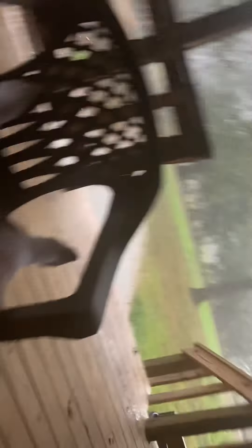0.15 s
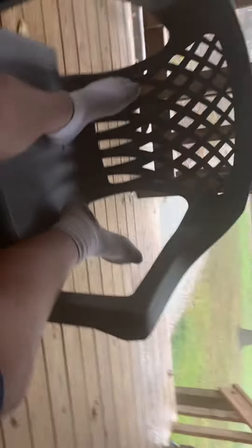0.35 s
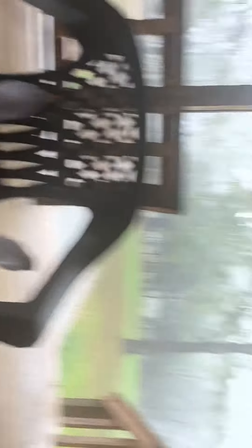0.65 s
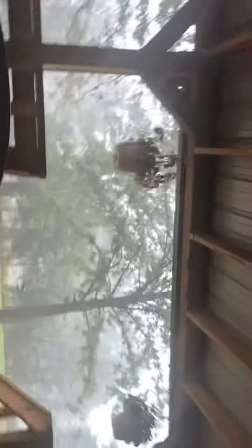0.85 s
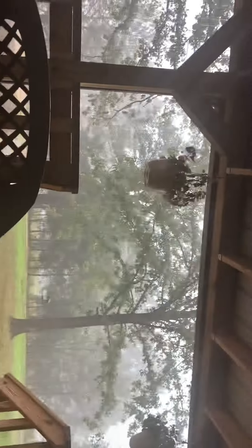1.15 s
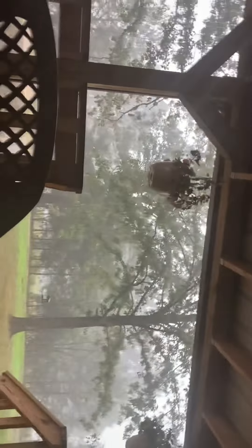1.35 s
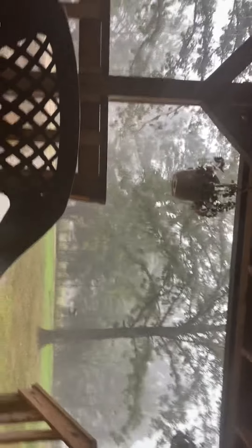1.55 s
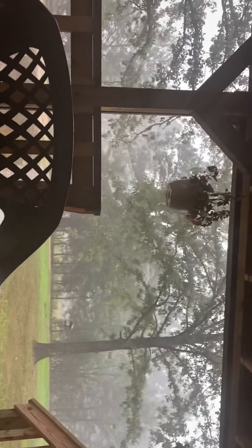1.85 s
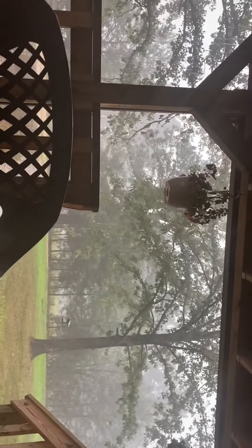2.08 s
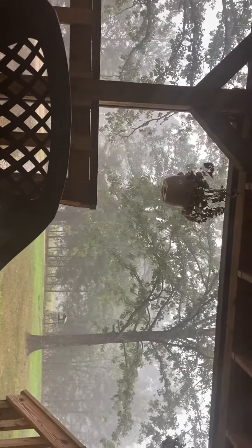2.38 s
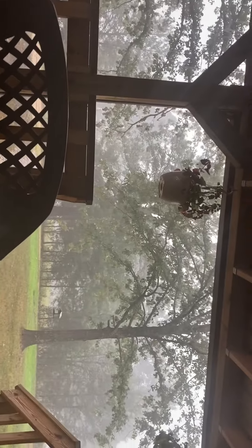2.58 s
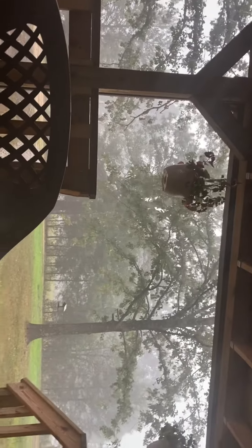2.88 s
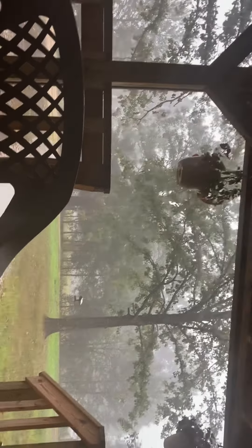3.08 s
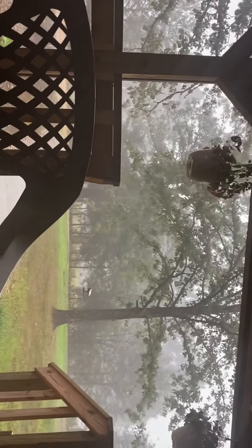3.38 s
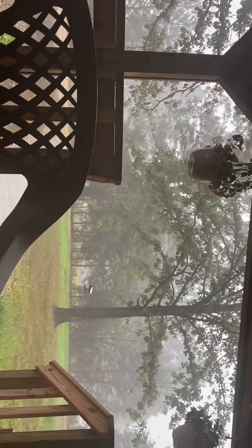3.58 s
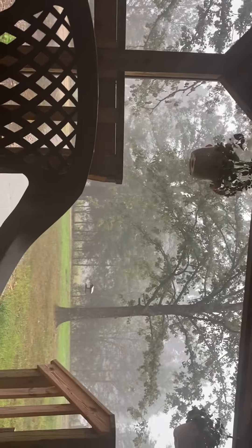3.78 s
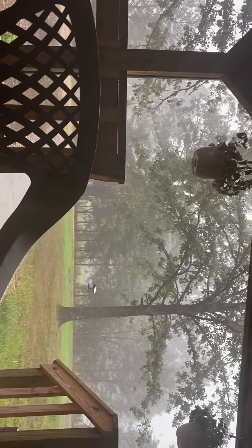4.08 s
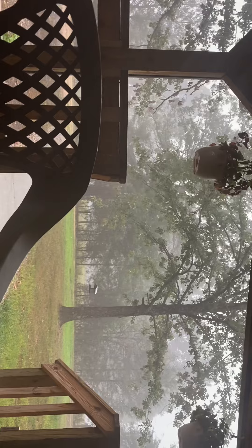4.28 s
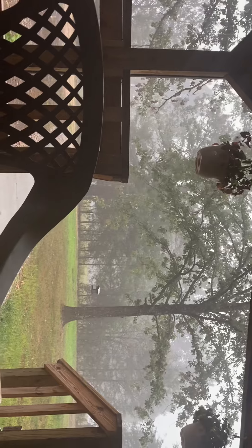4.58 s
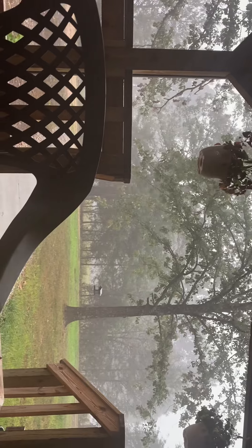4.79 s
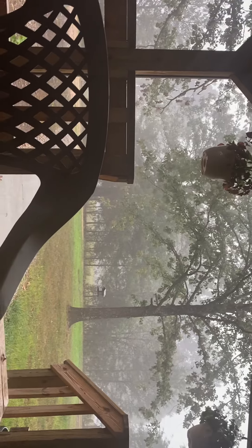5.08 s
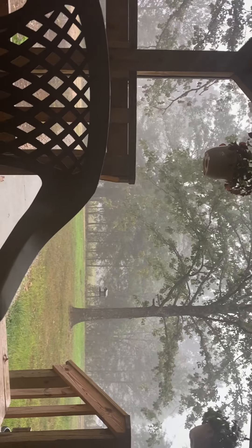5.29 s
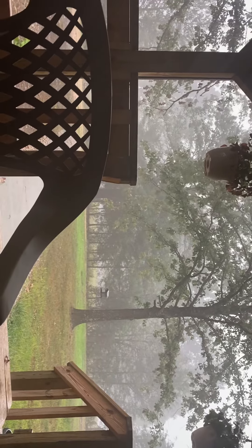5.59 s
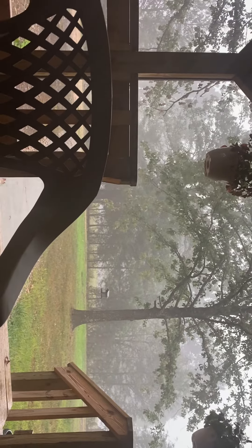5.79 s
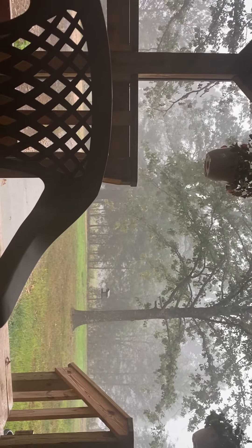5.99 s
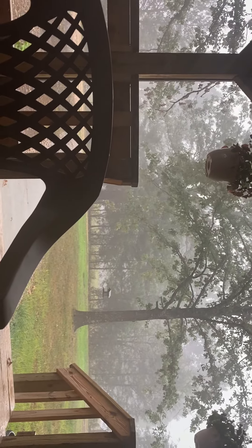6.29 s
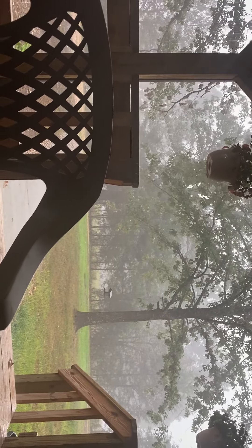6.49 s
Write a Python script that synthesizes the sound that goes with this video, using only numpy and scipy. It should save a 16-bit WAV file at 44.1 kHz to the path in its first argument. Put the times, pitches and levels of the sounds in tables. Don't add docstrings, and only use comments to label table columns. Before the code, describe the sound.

Heavy rain drums on a corrugated metal porch roof, a dense steady roar with bright hissing spray and occasional close drip splats.

```python
import sys
import numpy as np
from scipy import signal
from scipy.fft import rfft, irfft, next_fast_len
from scipy.io import wavfile
from scipy.ndimage import uniform_filter1d

SR = 44100
rng = np.random.default_rng(int(sys.argv[2]) if len(sys.argv) > 2 else 0)


def dump(signal):
    limited = np.clip(np.atleast_2d(signal).T, -1, 1)
    pcm = np.round(limited * 32767).astype(np.int16)
    wavfile.write(sys.argv[1], SR, pcm)


def voltage_ratio(level):
    return 10 ** (np.asarray(level, float) / 20)


N = 293265
SIZE = next_fast_len(N + SR)
HZ = np.maximum(np.arange(SIZE // 2 + 1) * SR / SIZE, 1)
TO_CENTRE_SIDES = np.array([[1, 1], [1, -1]]) / 2


# mode_hz, width_hz, level_db
SHEET_MODES = [(58.7, 43, -7.5), (83, 45, -4.5), (118, 23, -1.5), (155.9, 12.3, -1), (182.3, 22, -3.5),
               (227, 17.6, 0.5), (254.8, 21, -1), (275.8, 16.5, 0.5), (305, 23, -2.5), (331.4, 28, -3.5),
               (389.8, 36.6, -3), (412.4, 16.4, -1.5), (469.4, 59, -8)]


def drumming():
    response = 0
    for k, (mode_hz, width_hz, level_db) in enumerate(SHEET_MODES):
        damping = 1j * width_hz * HZ
        response = response + (-1) ** k * voltage_ratio(level_db) * damping / (mode_hz ** 2 - HZ ** 2 + damping)
    return layer(response, per_s=3000, spread_db=2.5, gust_db=0.5, gust_hz=2.2,
                 mean_db=-24.5, rain_share=1.04, blown_share=0.5, floor_db=-0.4)


# freq_hz, level_db (per Hz)
PATTER_COLOUR = [(200, -23), (380, -9), (520, -2), (950, -3), (1100, -1.7), (1280, -2), (1500, -5.5),
                 (1800, -14), (2600, -34.5)]


def patter():
    return layer(voltage_ratio(at_hz(PATTER_COLOUR)), per_s=9000, spread_db=2.5, gust_db=0.5, gust_hz=8.5,
                 mean_db=-25, rain_share=0.5, blown_share=0.54, floor_db=1.5)


# freq_hz, level_db (per Hz)
SPLASH_COLOUR = [(1100, -37), (1600, -6.5), (2100, 0.5), (2310, -2.5), (3200, -4), (4000, -6.5),
                 (4600, -11), (5300, -12), (6300, -26)]


def splashes():
    return layer(voltage_ratio(at_hz(SPLASH_COLOUR)), per_s=24000, spread_db=2.0, gust_db=0.2, gust_hz=14.0,
                 mean_db=-28.5, rain_share=0.35, blown_share=0.38, floor_db=1.5)


# freq_hz, level_db (per Hz)
SPRAY_COLOUR = [(3800, -14), (5000, 3), (5900, 7), (6500, 6.5), (7000, 5), (8000, 1.5), (10000, 0),
                (12000, -1.5), (14000, -5.7), (15700, -8.8)]


def spray():
    coarse = 1 / (1 + (HZ / 8000) ** 6)
    colour = voltage_ratio(at_hz(SPRAY_COLOUR))
    low = layer(colour * np.sqrt(coarse), per_s=27000, spread_db=3.5, gust_db=0.67, gust_hz=13,
                mean_db=-41, rain_share=0.15, blown_share=0.75, floor_db=4)
    mist = layer(colour * np.sqrt(1 - coarse), per_s=27000, spread_db=1.5, gust_db=1.5, gust_hz=15,
                 mean_db=-41.5, rain_share=1, blown_share=0.5, floor_db=-2.5)
    return low + mist


# start_s, peak_db
DRIPS = [(0.0268, -28), (0.1042, -30.5), (0.2628, -29), (0.417, -36), (0.8734, -33), (1.4671, -30),
         (1.8223, -31), (2.1146, -30), (2.3555, -31), (2.3994, -22), (2.616, -28), (2.7147, -30),
         (2.9073, -26), (2.9552, -23), (3.1672, -30), (3.4461, -22), (3.8756, -32), (4.0662, -20),
         (4.6364, -25), (4.7267, -24), (4.9302, -29), (5.1662, -27), (5.2006, -28), (5.5403, -31),
         (5.659, -28), (5.9174, -33), (6.3285, -28), (6.3909, -33)]
# freq_hz, level_db (per Hz)
SPLAT_COLOUR = [(3000, -24), (6000, -36), (8500, 22.5), (12000, 16), (15500, 5)]


def drips():
    decay_s, rise_s, gain_db = 0.0067, 0.001, -7.0
    t = np.arange(round(0.04 * SR)) / SR
    burst = np.exp(-t / decay_s) * np.minimum(t / rise_s, 1)
    envelope = np.zeros(N + len(t))
    for start_s, peak_db in DRIPS:
        at = round(start_s * SR)
        envelope[at:at + len(t)] += voltage_ratio(peak_db + gain_db) * burst
    fizz = at_ports(drops(per_s=20000, spread_db=4.5), voltage_ratio(at_hz(SPLAT_COLOUR)))
    return envelope[:N] * rms_one(fizz)


# centre_s, pitch_hz, level_db, length_s
SWELLS = [(0.806, 240, -31, 0.21), (5.082, 230, -30, 0.11), (5.9, 277, -34.5, 0.44),
          (6.276, 238, -24.5, 0.21), (6.25, 168, -37, 0.15), (6.1, 340, -30, 0.22), (3.7, 380, -32, .2),
          (5.7, 2700, -39, .12), (.15, 1350, -34.5, .2), (3.035, 72, -41, 0.064), (4.47, 63, -39, 0.17),
          (5.5, 75, -39, .15), (5.9, 62, -40, .15), (4.5, 100, -34, .15), (5.95, 121, -33, 0.13),
          (4.9, 210, -38, .15), (5.65, 260, -34, 0.16), (5.47, 370, -29.5, .15), (5.3, 415, -31, 0.14),
          (5.5, 270, -29, 0.17), (5.62, 2120, -35, .1), (2.67, 260, -36, 0.059), (4.8, 330, -30, 0.072)]
# centre_s, pitch_hz, level_db, length_s
SHORT_SWELLS = [(0.104, 787, -35, 0.12), (0.232, 155, -25, 0.099), (0.337, 118, -24.5, 0.17),
                (0.418, 836, -31, 0.12), (0.557, 118, -32, 0.1), (0.836, 240, -28.3, 0.12),
                (1.823, 702, -31, 0.17), (2.136, 158, -27.5, 0.11), (2.473, 108, -31.7, 0.12),
                (2.647, 710, -29, 0.1), (2.717, 570, -33.9, 0.11), (2.868, 380, -27.5, 0.086),
                (3.077, 226.5, -28.6, 0.15), (3.367, 227, -30, 0.08), (3.437, 533, -32, 0.091),
                (3.506, 380, -30, 0.11), (3.959, 462, -37, 0.12), (4.458, 699, -34, 0.12),
                (4.714, 118, -35, 0.12), (5.097, 273, -25, 0.11), (5.561, 474, -30, 0.1),
                (5.84, 159, -26, 0.12), (6.177, 663, -38, 0.11), (6.258, 118, -26, 0.12)]
# centre_s, pitch_hz, level_db
PINGS = [(0.522, 5598, -37.8), (0.656, 4737, -38.7), (1.042, 947, -28.0), (1.318, 3962, -37.6),
         (1.541, 5340, -40.4), (1.675, 4995, -40.2), (1.826, 4263, -40.8), (1.898, 4005, -39.1),
         (1.924, 5900, -42.4), (2.226, 4177, -38.6), (2.278, 2110, -32.7), (2.29, 2670, -36.1),
         (2.293, 6115, -44.9), (2.505, 2756, -36.3), (2.746, 2110, -31.0), (2.795, 5081, -39.1),
         (2.932, 904, -28.3), (3.01, 2067, -31.4), (3.024, 3789, -38.6), (3.123, 2583, -36.4),
         (3.396, 2756, -37.4), (3.466, 4134, -38.7), (3.466, 5297, -42.0), (3.564, 2971, -37.6),
         (3.59, 5727, -43.4), (3.596, 2325, -32.0), (3.828, 5167, -40.4), (3.843, 3402, -37.0),
         (3.881, 5211, -40.8), (3.968, 2497, -35.5), (4.052, 4651, -40.9), (4.113, 2110, -31.3),
         (4.168, 3273, -36.7), (4.214, 2756, -34.3), (4.217, 6287, -45.8), (4.246, 2024, -31.2),
         (4.284, 4134, -37.7), (4.397, 2583, -34.9), (4.423, 3660, -37.2), (4.566, 6158, -43.9),
         (4.676, 5512, -42.2), (4.838, 2713, -33.9), (5.413, 3143, -36.9), (5.776, 2540, -35.1),
         (5.878, 4048, -37.9), (5.912, 5857, -43.2), (5.944, 4823, -41.1), (5.959, 4263, -40.2),
         (5.982, 5297, -41.3), (6.087, 3057, -35.2), (6.147, 4177, -37.7), (6.194, 3919, -35.5),
         (6.348, 4694, -41.6), (6.473, 2497, -33.9), (6.565, 5857, -42.8)]


def swells():
    rows = list(SWELLS)
    rows += [(s, hz, db - 2.5, length_s) for s, hz, db, length_s in SHORT_SWELLS]
    rows += [(s, hz, db - 5, 0.024) for s, hz, db in PINGS]
    out = np.zeros((2, N))
    chance = rng.uniform(-1.02, 1, (len(rows), 3))
    for (centre_s, pitch_hz, level_db, length_s), (start, apart, bend) in zip(rows, chance):
        first = max(round((centre_s - length_s) * SR), 0)
        at = np.arange(first, min(round((centre_s + length_s) * SR), N))
        t = at / SR - centre_s
        lag_rad = 0.27 * apart * min(pitch_hz / 500, 1)
        phase = 2 * np.pi * pitch_hz * t * (1 + 0.014 * bend * t / length_s) + np.pi * start
        tone = np.sin(phase + lag_rad * np.array([[1], [-1]])) / np.cos(lag_rad)
        out[:, at] += voltage_ratio(level_db) * np.sqrt(2) * np.exp(-(2 * t / length_s) ** 2) * tone
    return out


# start_s, rain_db, blown_db
RAIN = [(0, 1.5, -2.5), (.35, -1, 1.5), (.65, 2.5, -1.5), (1.0, -1, 1), (1.6, -2.5, 2), (2.0, -0.5, 1.5),
        (2.3, -2, 1.5), (2.8, 0, 0), (3.3, 0.2, -1), (4.0, 1.5, 0), (4.5, -1.5, 2), (5.1, 0.9, 0),
        (5.5, 2.2, 0), (5.9, -1.4, 3.5), (6.25, 3.5, -1), (6.45, -0.5, 2.5), (6.65, 4.5, -2)]


def layer(response, per_s, spread_db, gust_db, gust_hz, mean_db, rain_share, blown_share, floor_db):
    start_s, rain_db, blown_db = np.transpose(RAIN)
    swing_db = np.interp(np.arange(N) / SR, start_s, rain_share * rain_db + blown_share * blown_db)
    sound = at_ports(drops(per_s, spread_db), response)
    return voltage_ratio(mean_db + swing_db + floor_db * facing_floor() + gust_db * drift(gust_hz)) * sound


def drops(per_s, spread_db):
    falls = rng.random((3, SIZE)) < per_s / SR
    sizes = voltage_ratio(spread_db * np.minimum(rng.exponential(1, (3, SIZE)), 5))
    return falls * sizes * rng.choice([-1, 1], (3, SIZE))


def drift(rate_hz):
    r = np.exp(-80 * np.pi * rate_hz / SR)
    noise = rng.standard_normal(N // 40 + 2002)
    slow = signal.lfilter([1], [1, -2 * r, r * r], noise)[2000:]
    return np.interp(np.arange(N) / 40, np.arange(len(slow)), rms_one(slow))


def rms_one(x):
    return x / np.sqrt(np.mean(x ** 2) + 1e-20)


def at_hz(points):
    hz, value = np.transpose(points)
    return np.interp(np.log(HZ), np.log(hz), value)


# freq_hz, level_db
DIFFUSE = [(110, -22.5), (260, -18), (500, -.4), (1400, -.6), (1900, -3.7), (2800, -1.7), (4500, -2.4),
           (7300, -10.8)]
# freq_hz, phase_rad
RIGHT_PHASE = [(400, 0), (1000, 1.3), (1950, -.1), (2750, -1.8), (3800, -1.2), (4500, -1.3), (5200, -.45),
               (5500, -.8), (7250, -3.14)]
# freq_hz, level_db
RIGHT_LOUDER = [(100, .1), (200, .6), (400, .1), (620, 1.1), (1200, 0), (2500, .4), (6000, 0)]


def at_ports(showers, response):
    lag_from_hz, port_lag_s, lag_growth_s_per_hz = 7250, 1.42e-4, 2.3e-9
    open_db, floor_db = -1.5, -1
    common, left, right = rfft(showers) * response
    own = np.minimum(voltage_ratio(at_hz(DIFFUSE)), 1)
    above_hz = np.maximum(HZ - lag_from_hz, 0)
    lag_rad = 2 * np.pi * (port_lag_s + lag_growth_s_per_hz * above_hz) * above_hz
    turn = np.exp(0.5j * (at_hz(RIGHT_PHASE) - lag_rad)) * voltage_ratio(at_hz(RIGHT_LOUDER) / 2)
    ports = np.array([1 / turn, turn])
    shared = irfft(np.sqrt(1 - own ** 2) * common * ports, SIZE)[:, :N]
    apart = irfft(own * np.array([left, right]) * ports, SIZE)[:, :N]
    pair = shared + voltage_ratio(open_db + floor_db * facing_floor()) * apart
    return pair / np.sqrt(np.mean(np.mean(pair, axis=0) ** 2))


def facing_floor():
    turn_start_s, turn_s = 0.66, 0.85
    return np.clip(1 - (np.arange(N) / SR - turn_start_s) / turn_s, 0, 1)


def sway(pair):
    wobble_s = 1.6e-6
    slope = irfft(rfft(pair, SIZE) * 2j * np.pi * HZ, SIZE)[:, :N]
    return pair + wobble_s / 2 * drift(5.7) * slope * [[1], [-1]]


# freq_hz, level_db
FLOOR_CENTRE = [(150, 0), (500, 0.3), (1000, -1), (1300, 1.5), (1800, -0.3), (2300, 0.5), (2900, 2),
                (4000, 0.76)]
FLOOR_SIDES = [(250, -2.5), (480, -4), (650, 0.5), (1400, -2), (1900, -3), (2300, 1), (3600, -1.5),
               (5000, 0.4)]
OPEN_SIDES = [(220, -1.5), (330, 3), (480, -0.2), (700, 2), (870, 0), (1900, .8), (2500, 2.2), (3400, 0.5)]


def aim(pair):
    centre_sides = rfft(np.array([[1, 0.98], [1, -1.016]]) @ pair / 2, SIZE)
    floor_gain = voltage_ratio(np.array([at_hz(FLOOR_CENTRE), at_hz(FLOOR_SIDES)]))
    open_gain = voltage_ratio(np.array([0 * HZ, at_hz(OPEN_SIDES)]))
    down = irfft(centre_sides * floor_gain, SIZE)[:, :N]
    up = irfft(centre_sides * open_gain, SIZE)[:, :N]
    return np.array([[1, 1], [1, -0.91]]) @ (up + facing_floor() * (down - up))


def scene():
    rain = drumming() + patter() + splashes() + spray()
    return aim(sway(rain)) + drips() + swells()


# freq_hz, level_db
GATE = [(2000, -7), (4500, -5.6), (6000, -5.9), (10000, -5.4), (12500, -4.7), (14000, -3.1), (15000, -3.3),
        (15700, -4.3)]
# freq_hz, level_db
MASKED = [(2500, -60), (5850, -14), (6550, -7.5), (7900, -9), (8600, -13), (9300, -7.6), (10000, -5),
          (11370, -6.3), (12050, -8), (12750, -3), (14800, -3.9), (15450, -4)]


def gate(pair):
    band_steps, speckle_db = 16, -0.8
    hz, _, cells = signal.stft(TO_CENTRE_SIDES @ pair, SR, nperseg=1024, noverlap=768)
    power = np.abs(cells) ** 2
    total = np.sum(power, axis=0)
    usual = np.mean(total, axis=1, keepdims=True)
    usual = usual * np.sqrt(patches(total / usual, size=(41, 171)))
    gate_db = np.interp(hz, HZ, at_hz(GATE))
    faint = patches(total, size=(3, 7)) < usual * voltage_ratio(2 * gate_db)[:, None]
    faint = patches(1.0 * faint, size=(2, 7)) > 1e-6
    band = np.arange(len(hz)) // band_steps
    band_power = np.add.reduceat(power, np.arange(0, len(hz), band_steps), axis=1)
    wide = patches(band_power, size=(1, 5))[:, band]
    masked_db = np.interp((band + 0.5) * band_steps * hz[1], HZ, at_hz(MASKED))
    limit = wide[::-1] * voltage_ratio(2 * masked_db)[:, None]
    speckle = patches(power, size=(3, 5)) * band_steps < limit * voltage_ratio(2 * speckle_db)
    muted = faint | (wide < limit) | speckle
    kept = signal.istft(cells * ~muted, SR, nperseg=1024, noverlap=768)[1][:, :N]
    return np.array([[1, 0.94], [1, -1.013]]) @ kept


def patches(power, size):
    return uniform_filter1d(uniform_filter1d(power, size=size[0], axis=-2), size=size[1], axis=-1)


def roll_off(x):
    return signal.sosfilt(signal.butter(12, 15730, fs=SR, output="sos"), x)


def record(dry):
    thin = signal.sosfilt(signal.butter(3, 42, "high", fs=SR, output="sos"), dry)
    rounded = 0.92 * np.tanh(thin / 0.89)
    cutoff_hz = 15740
    top_cut = irfft(rfft(gate(rounded), SIZE) * (HZ < cutoff_hz), SIZE)[:, :N]
    return roll_off(top_cut)


dry = scene()
out = record(dry)
dump(out)
```